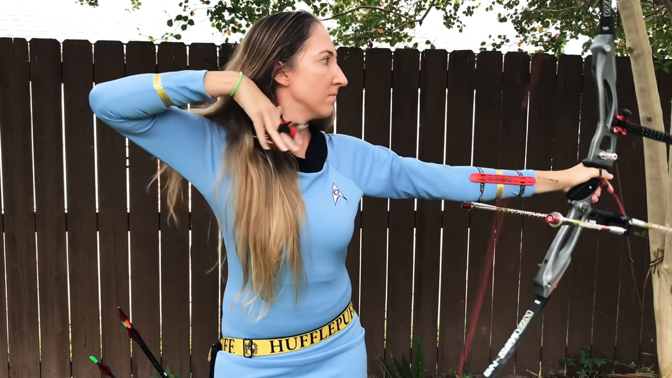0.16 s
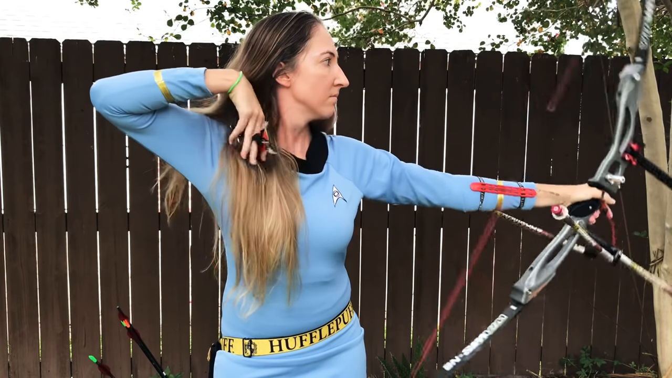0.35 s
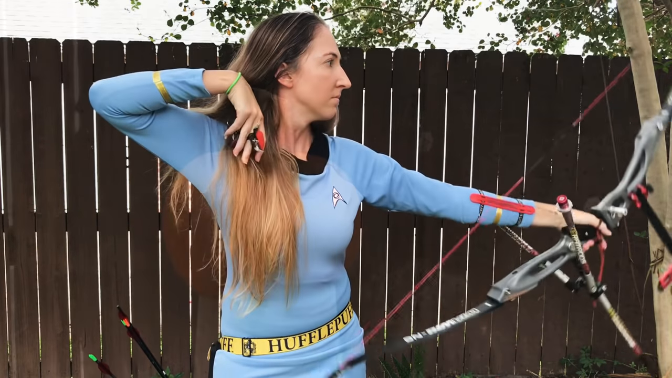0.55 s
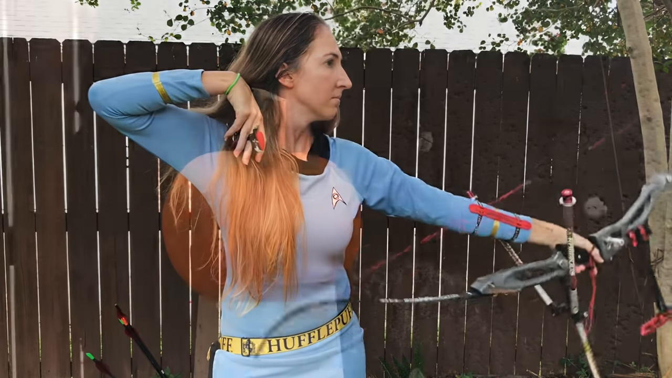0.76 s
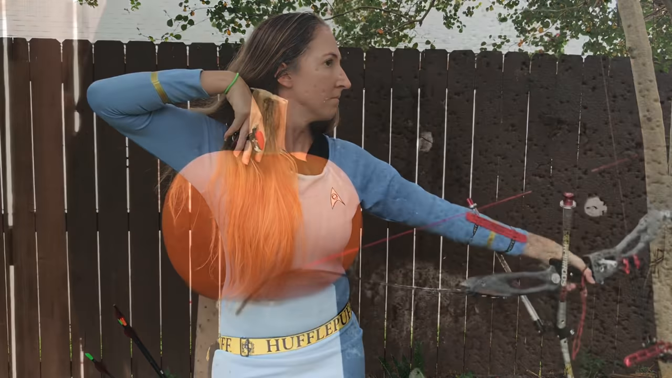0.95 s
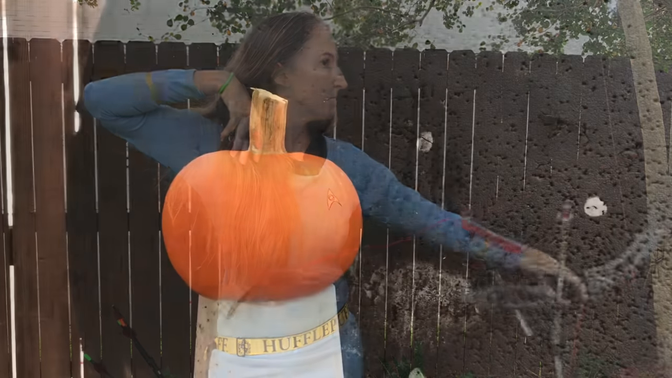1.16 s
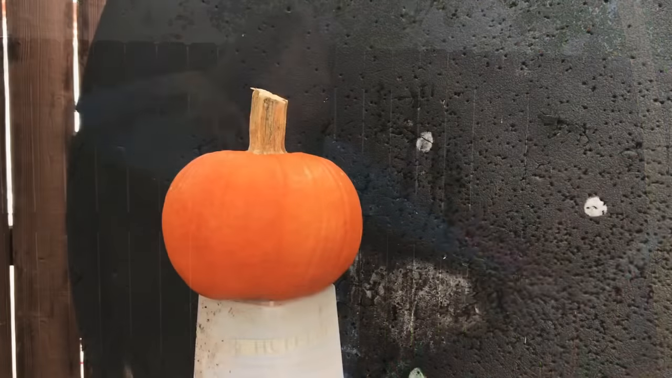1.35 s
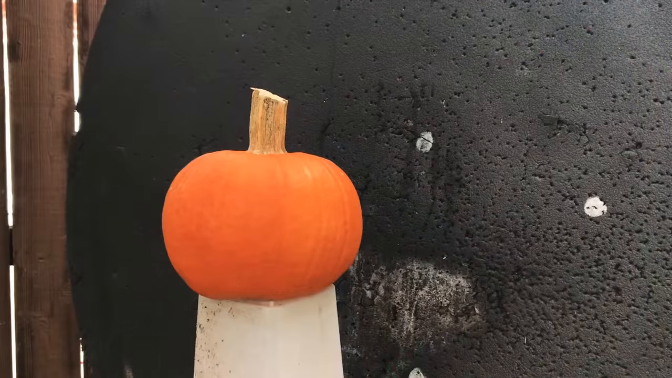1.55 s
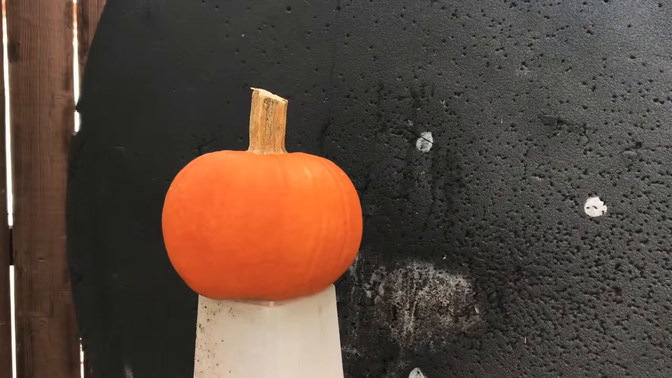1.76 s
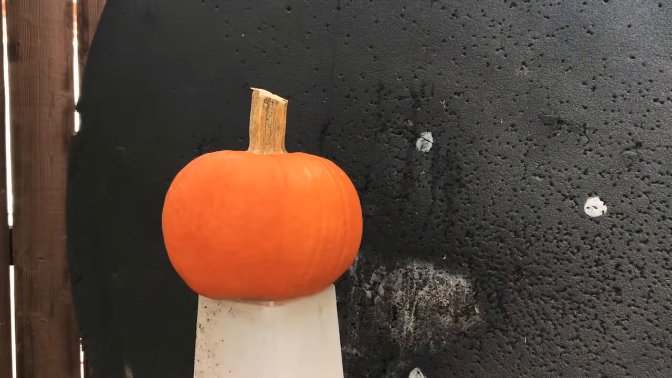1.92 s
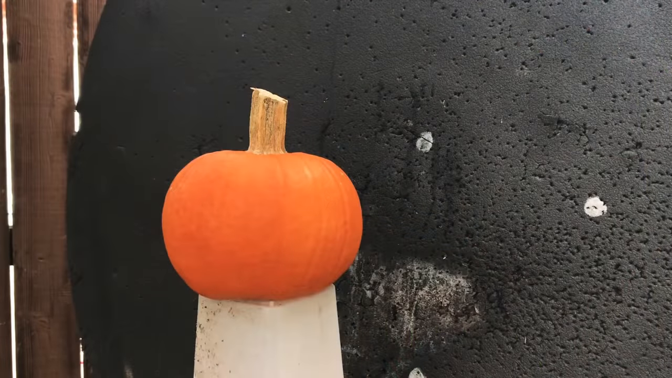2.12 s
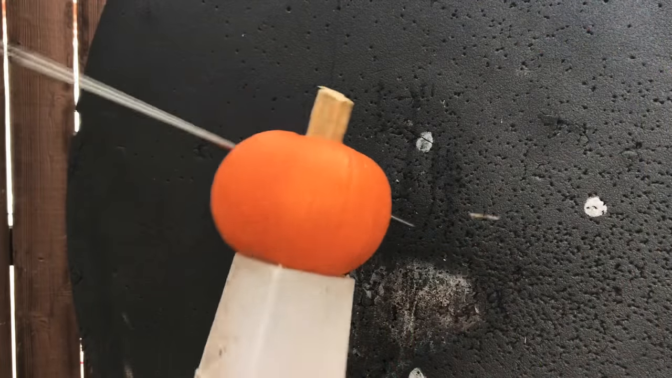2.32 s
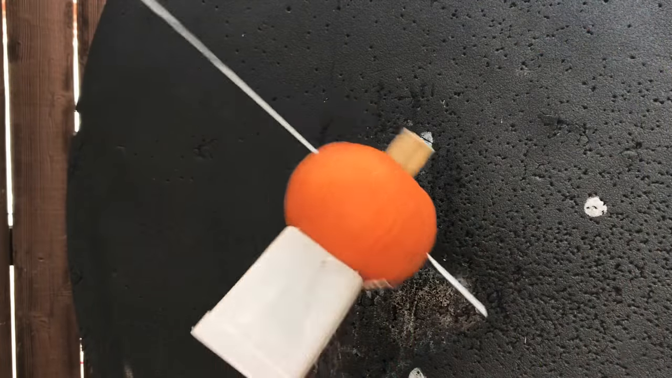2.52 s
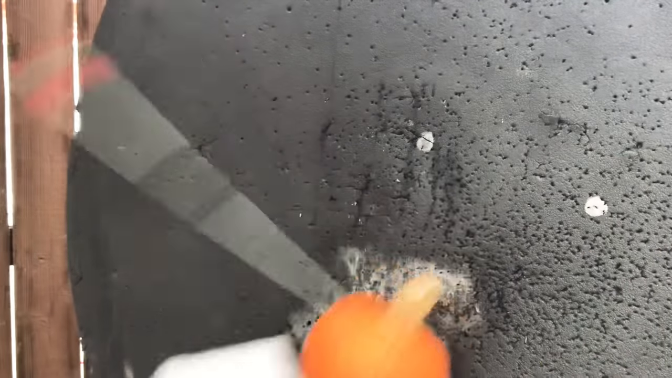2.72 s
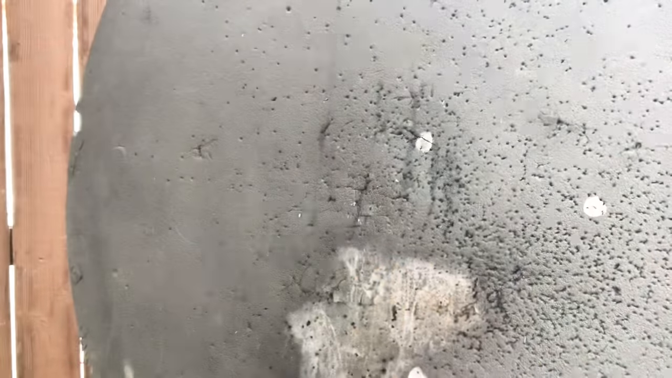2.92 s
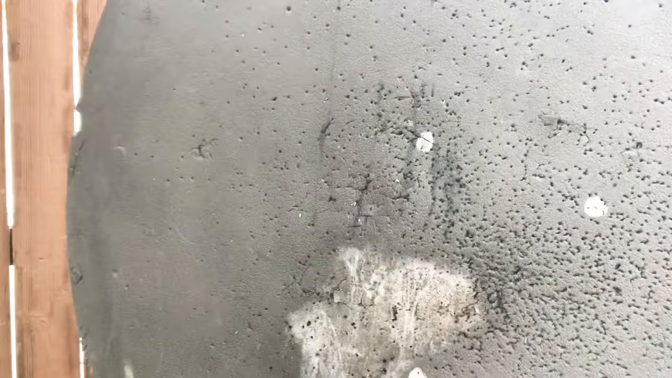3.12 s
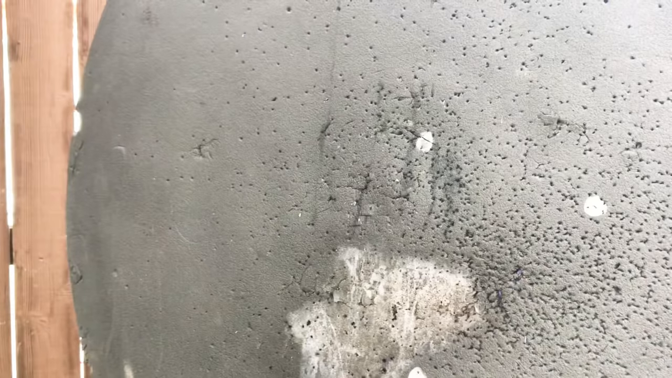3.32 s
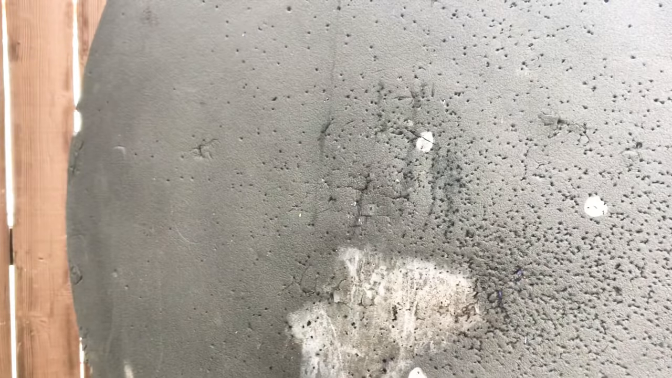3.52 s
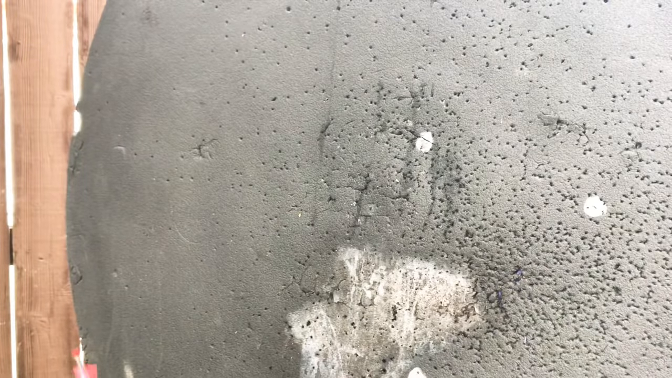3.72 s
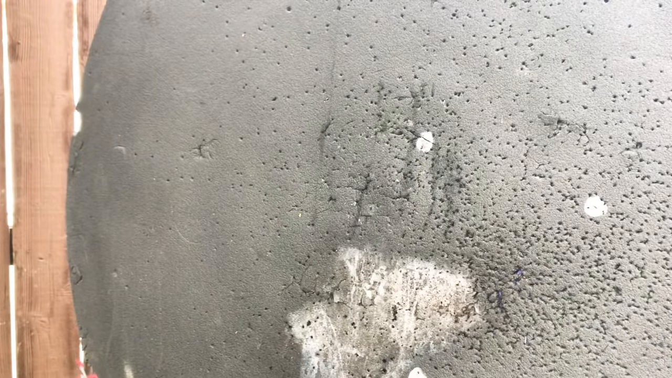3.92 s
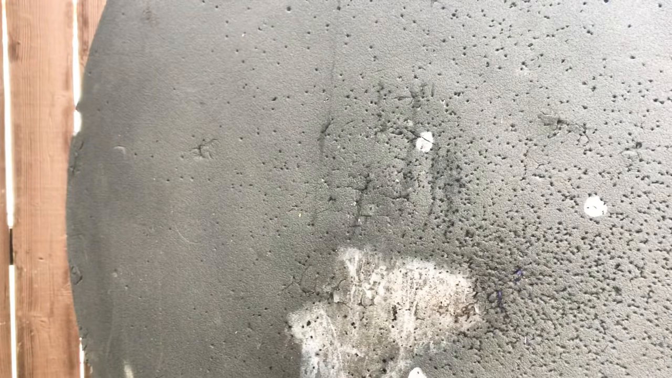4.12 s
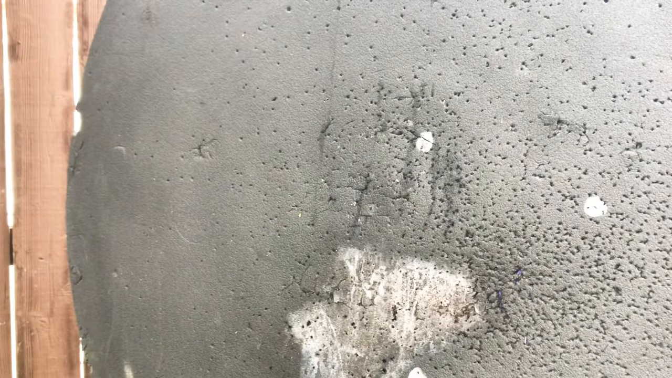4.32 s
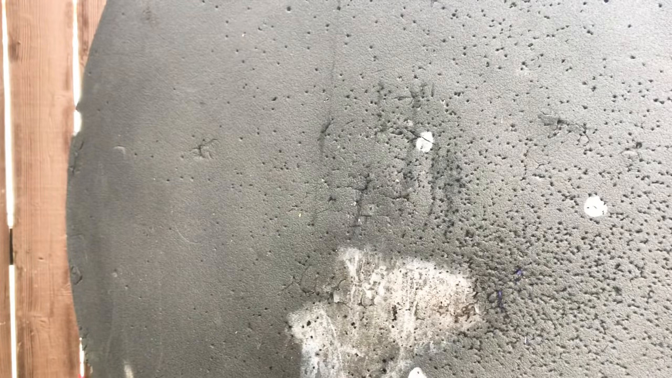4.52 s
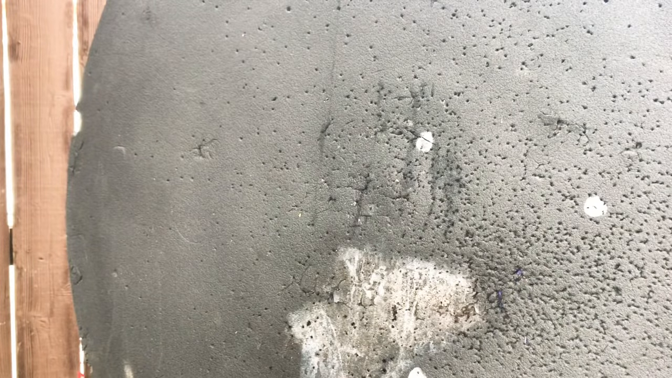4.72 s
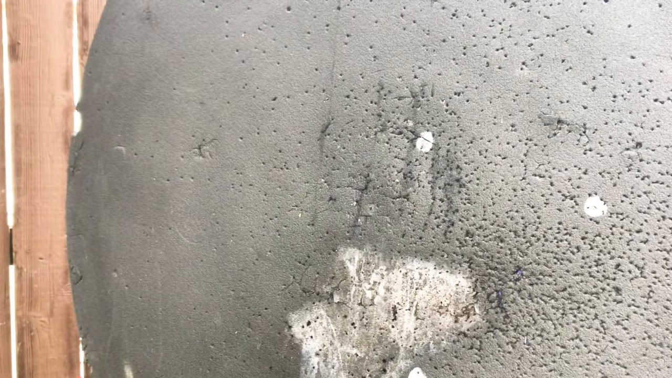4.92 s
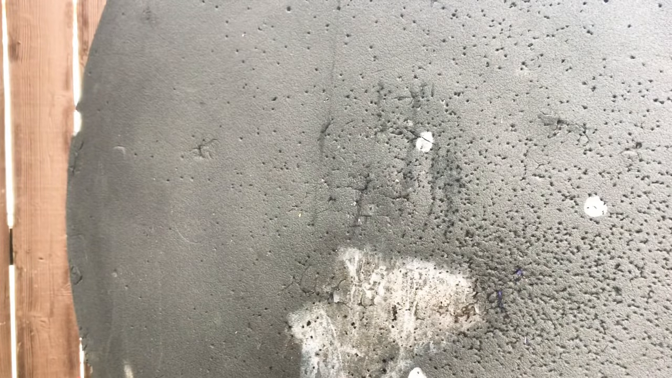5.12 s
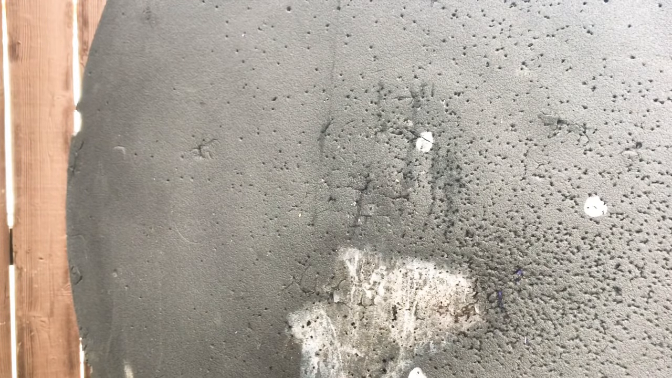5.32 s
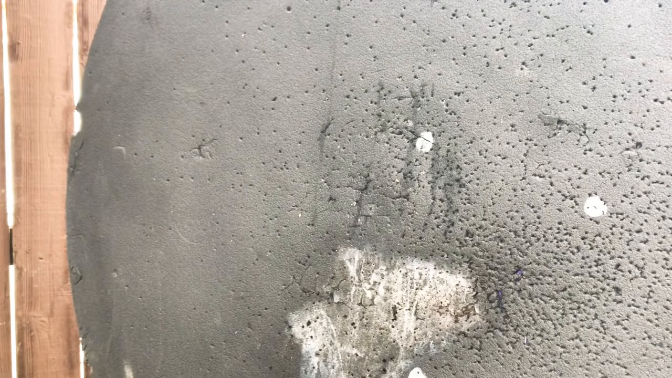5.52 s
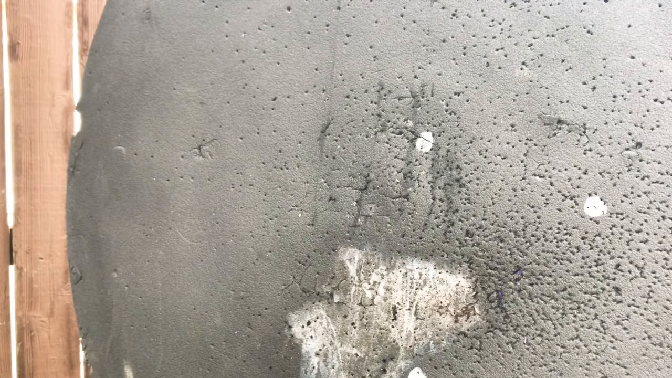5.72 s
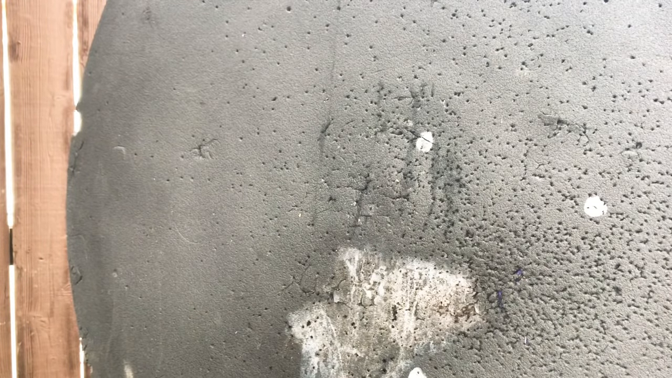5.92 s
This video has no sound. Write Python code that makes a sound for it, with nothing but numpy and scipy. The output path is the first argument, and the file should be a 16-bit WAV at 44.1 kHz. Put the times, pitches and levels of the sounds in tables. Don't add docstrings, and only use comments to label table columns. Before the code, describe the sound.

In a fenced yard with low distant traffic, a bowstring zips loose, limbs rattle and hum, and an arrow slaps foam almost at once. After a quiet gap, close up, an arrow cracks through a pumpkin; its hollow plastic stand knocks, scrapes, squeaks, topples and bounces loudly, then settles with light taps. The arrow shaft finally rustles in dry leaves.

```python
import sys
import numpy as np
from scipy import signal
from scipy.fft import rfft, irfft
from scipy.io import wavfile
from scipy.ndimage import uniform_filter1d, map_coordinates

SR = 44100
rng = np.random.default_rng(int(sys.argv[2]) if len(sys.argv) > 2 else 0)


def file_out(sig):
    cols = np.atleast_2d(sig).T
    lim = np.clip(cols, -1, 1)
    pcm = np.round(lim * 32767).astype(np.int16)
    wavfile.write(sys.argv[1], SR, pcm)


def invert_db(x):
    u = np.asarray(x, float) / 20
    return 10 ** u


N = 267246

# (time [s], level [dB])
AIR_GAIN = [(0.0, -41.5), (0.52, -54), (2.04, -55.5), (2.8, -44), (3.93, -54.5), (6.06, -55)]
# (frequency [Hz], density [dB per Hz])
TRAFFIC_SPECTRUM = [(25, -17), (43, 0), (107, 4), (223, -6), (345, -9.5), (500, -26.5), (1200, -32.5),
                    (2640, -120)]
HISS_SPECTRUM = [(240, -36), (400, -8), (472, -4), (501, -6.5), (540, -4), (3590, -16.5), (14500, -26.5)]
HISS_DB, CLOSER_START_S, CLOSER_RAMP_S, CLOSER_DB = -16, 0.55, 1.6, 5.5
# (frequency [Hz], t60 [s])
YARD_T60 = [(200, 0.9), (1500, 0.5), (4000, 0.68), (12000, .2)]

# (time [s], peak [dB], centre [Hz])
SHARP_TICKS = [(.018, -45, 9000), (.022, -48, 4000), (.038, -27, 4500), (.0415, -18, 10600),
               (.054, -16, 12000), (.138, -28, 13500), (.149, -26, 12000), (.178, -38, 11000),
               (.687, -56, 7000), (2.356, -27, 4500), (2.556, -40, 3000), (2.592, -40, 3000),
               (2.8715, -20, 4000), (2.909, -30, 1200), (4.846, -32, 7500), (5.167, -48, 12000),
               (.061, -14.5, 10900), (.083, -17.5, 9780), (2.3018, -6, 10500), (2.7175, -25, 7750),
               (2.9895, -17, 10500), (2.926, -33, 8960), (3.37, -39, 7570), (3.416, -14, 7000),
               (3.622, -44, 4070), (3.847, -30, 3300), (4.825, -23.5, 8944), (4.877, -30, 14000),
               (4.874, -36, 14000), (5.032, -21.5, 4010), (5.134, -38.5, 12080)]

# (time [s], level [dB])
LIMB_SHUDDER = [(.034, -59.5), (.04, -31), (.054, -18.5), (.078, -19), (.118, -30), (.155, -36), (.27, -54),
                (.553, -63.5), (.56, -90)]
# (frequency [Hz], density [dB per Hz])
LIMB_SPECTRUM = [(60, -39.5), (100, -14), (197, -1), (752, -14), (1200, -12.5), (2370, -12), (5900, -16.5),
                 (16000, -25)]
# (frequency [Hz], level [dB], t60 [s])
LIMB_MODES = [(186, -15.5, 0.17), (152, -40, 2.3), (592, -35, .4), (300, -26, .08), (910, -19, 0.2),
              (1120, -23, .1), (1620, -28.5, 0.13), (2200, -24, .1), (3180, -24, .1), (1990, -27, .12),
              (5160, -28, .1), (6070, -30, .15)]
# (frequency [Hz], level [dB], t60 [s])
LIMB_HUM = [
    (189.6, -30, 1.25),
    (191.8, -30, 1.2),
]
# (frequency [Hz], level [dB], t60 [s])
FOAM_MODES = [(1280, 7, 0.014), (1500, -3, 0.019), (1790, -3, .018), (2400, -9, 0.014)]

# (time [s], length [s], start [Hz], end [Hz], level [dB])
STRING_ZIP = [
    (0.042, 0.0086, 2690, 3890, -11.5),
    (0.048, 0.004, 3900, 2900, -16),
    (0.051, 0.0053, 2700, 2200, -18.5),
]
# (time [s], length [s], start [Hz], end [Hz], level [dB])
PLASTIC_SQUEAK = [
    (2.7835, 0.012, 3980, 4500, -10),
]
SLIP_SHARE = 0.03

# (time [s], peak [dB], frequency [Hz], rise [ms])
HOLLOW_BOOMS = [(2.292, -21, 296, 6), (2.331, -27, 264, 3.7), (2.413, -20, 291, 1.7),
                (2.463, -28.5, 304, 1.8), (2.499, -20, 275, 8.4), (2.535, -16, 288, 7.6),
                (2.597, -29.5, 307, 5.9), (2.65, -33, 275, 2.8), (2.801, -29, 234, 4.7),
                (2.879, -12.5, 283, 1.7), (2.921, -18, 280, 1.7), (2.954, -8.5, 288, 13),
                (2.975, -22, 288, 8), (2.992, -7, 288, 6), (3.191, -41, 301, 7.5), (3.238, -45, 285, 9),
                (3.301, -50, 231, 2.6), (3.4279, -13, 280, 3), (3.435, -10, 280, 4.5),
                (3.517, -40, 277, 2.1), (3.569, -37, 288, 15), (3.663, -39, 288, 5), (3.776, 0, 272, 11),
                (3.846, -33, 253, 5), (3.911, -35, 261, 3.4), (3.932, -37, 265, 6), (3.985, -42.5, 285, 5),
                (4.156, -38, 326, 7), (4.18, -29.5, 277, 7), (4.37, -35, 275, 10)]
HOLLOW_T60_S, FREER_S_PER_DB = 0.084, 0.0009
# (time [s], peak [dB], centre [Hz], click
# [dB])
WALL_KNOCKS = [(2.302, -8, 520, 6), (2.31, -8, 1050, -1), (2.331, -8, 680, -28), (2.356, -16, 1300, -10.5),
               (2.406, -13, 654, -17.5), (2.44, -29, 1094, -17.5), (2.475, -24, 651, -24.5),
               (2.517, -29.5, 1280, -11.5), (2.554, -33, 659, -12), (2.592, -42, 1030, -14),
               (2.706, -17, 900, -14), (2.74, -23, 940, -14), (2.797, -8, 700, -16), (2.879, -9, 850, -12),
               (2.919, -12, 1230, -18), (2.931, -16, 742, -26), (2.955, -11, 800, -14),
               (2.989, -1, 820, -14), (3.186, -31.5, 651, -4.5), (3.303, -27, 480, -22),
               (3.408, -10, 1100, -6), (3.416, -18, 1600, -3), (3.429, -12, 800, -7),
               (3.659, -31, 800, -24), (3.704, -32, 800, -18), (3.753, -43, 700, -20),
               (3.776, -1.5, 1120, -21), (4.155, -33, 1160, -16), (4.18, -33, 1200, -22),
               (4.376, -38, 851, -12),
               (2.99, -4, 1600, -31.5),
    (2.9895, -10, 3900, -26),
    (3.409, -3, 1080, -30),
    (3.847, -32, 3000, -8),
    (3.777, -10, 1900, -29.5),
    (2.879, -10, 1700, -30),
]
# (frequency [Hz], level [dB], share of blow t60 [1])
WALL_MODES = [(427, -7, 1.6), (508, -7, 1.2), (600, -6, 1.1), (727, -3, 1.15), (860, -3, 0.6),
              (1040, -2, 1.0), (1085, -1, .85), (1290, -3, 0.8), (1526, 1, 0.75), (1845, -2, 1.0),
              (2030, 0, 1.15), (2190, -2, .9), (2770, -8, .9), (4300, -14, 1)]
WALL_T60_S, HARD_SHORTENS, LIGHT_SHORTENS = 0.058, 0.5, 0.13
DETUNE_SHARE = 0.013
EDGE_DB = -10.5
# (time [s], level [dB],
# frequency [Hz], t60 [s])
LOW_RINGS = [(.46, -39, 84, .3), (2.293, -18, 100, .09), (2.294, -15, 190, .08), (2.36, -30, 185, .2),
             (2.43, -31, 200, .25), (2.313, -19, 530, .08), (2.333, -20, 630, .09), (2.362, -27, 570, .08),
             (2.408, -22, 600, .08), (2.465, -28, 610, .08), (2.54, -31, 580, .09), (2.645, -31, 345, .08),
             (2.665, -30, 600, .09), (2.812, -25, 560, .1), (2.802, -22, 745, .12), (2.99, -22, 200, .1),
             (2.792, -25.5, 65, .12), (2.878, -21, 140, .16), (2.987, -16, 110, .08), (3.41, -19, 160, .1),
             (3.777, -18, 120, .08), (4.181, -22, 132, 0.052), (4.184, -29, 387, 0.11),
             (4.81, -36, 822, 0.071), (4.82, -44, 620, .1), (4.85, -44, 1330, .12), (4.95, -48, 750, .12),
             (5.024, -41, 1300, .15), (5.05, -50, 930, .15), (5.112, -45, 680, .08),
             (5.615, -48, 1150, .1)]

# (time [s], level [dB], centre [Hz], share of t60 [1])
SHAFT_TAPS = [(2.3018, -16, 4300, .6), (2.3105, -13, 3400, 0.6), (2.37, -36, 4500, .5),
              (2.39, -33, 4500, 0.5), (3.318, -60, 5040, 1.25), (3.384, -49, 4000, .9),
              (4.828, -42, 7200, 0.7), (4.845, -50, 6400, .8), (5.022, -40, 5600, 1.3),
              (5.032, -46, 3370, 1.3), (5.073, -52, 4300, 1.6)]
# (frequency [Hz], level [dB], t60 [s])
SHAFT_MODES = [(1345, -6, .06), (2950, -5, 0.05), (3410, 3, 0.051), (3510, 2, 0.05), (4130, 1, 0.06),
               (4410, -10, 0.017), (4735, 0, .05), (5230, -4, .05), (6075, -1, .08), (6900, -9, 0.08),
               (9600, -9.5, .03), (11585, -5, .05)]
# (time [s], centre [Hz], level [dB])
FEATHER_FLIGHT = [
    (2.0, 2670, -85.5),
    (2.1, 2987, -72.5),
    (2.2, 3800, -71),
    (2.277, 4867, -69.5),
]

# (time [s], peak [dB], centre [Hz], treble [dB], t60 [s])
ENTRY_SCRAPES = [(2.278, -22, 4300, -10.5, .05), (2.289, -9, 3000, -17, 0.036),
                 (2.304, -3, 3417, -11.5, .13), (2.335, -25, 4660, -14.5, 0.35),
                 (2.65, -36, 4200, -22, .05), (2.99, -15, 1500, -20, 0.055),
                 (3.412, -7, 2539, -22.5, 0.066), (3.424, -7, 3000, -18, 0.035),
                 (3.778, -14, 1300, -30.5, 0.08), (3.317, -24, 4500, -9, .22),
                 (4.804, -27, 1200, -19.5, .17), (5.022, -26, 3420, -16.5, .12)]
# (time [s], peak [dB], centre [Hz], treble [dB])
STAND_SKIDS = [(2.4014, -17, 1580, -38), (2.666, -21, 1555, -30.5), (2.7094, -18.5, 1380, -20),
               (2.7134, -24.5, 1600, -25.5), (2.743, -20.5, 2400, -18.5), (2.7664, -15, 4010, -12),
               (2.797, -21, 2700, -20), (2.87, -9, 2400, -16), (2.925, -26, 1492, -29),
               (3.1797, -31, 2143, -7), (3.3827, -29, 1200, -5), (3.454, -27, 2160, -14.5),
               (3.5343, -35, 5620, -13), (3.626, -53, 2940, -22), (3.6548, -38.5, 1660, -21.5),
               (3.85, -35.5, 1500, -18), (3.985, -37, 2000, -24), (4.0, -38, 2200, -24),
               (4.1457, -32, 1940, -21), (4.2756, -43, 3170, -13.5), (4.363, -37, 1860, -26.5),
               (4.4857, -45, 2010, -35), (4.675, -45, 1700, -30)]
# (time [s], peak [dB], centre [Hz], treble [dB])
LEAF_BRUSHES = [(4.779, -31, 7000, -26), (4.823, -24, 8620, -16), (4.843, -32, 7100, -17.5),
                (4.862, -38, 4000, -11.5), (4.9107, -38, 5930, -10), (4.9342, -33, 3200, -17),
                (4.965, -38, 1500, -25), (4.99, -39, 1300, -30), (5.0633, -37, 4400, -23),
                (5.1074, -36, 1260, -20), (5.129, -37.5, 6600, -15), (5.3094, -49, 1510, -11.5),
                (5.4362, -48, 1330, -13), (5.5016, -43, 1404, -10.5), (5.635, -37, 2900, -23),
                (5.8574, -47, 4130, -11)]
SKID_T60_S, LEAF_T60_S = 0.08, 0.075
HOLD_S, HOLD_S_PER_DB, LONGEST_HOLD_S = 0.006, 0.0004, 0.018

# (time [s], effort [dB], grit share [dB])
TUMBLE_DRAG = [(2.28, -48, -14), (2.36, -34, -18), (2.74, -41, -17), (2.86, -41, -9), (3.0, -57, 5),
               (3.5, -58, 3), (3.7, -62, 2), (4.5, -66, -5)]
# (frequency [Hz], density [dB per Hz])
DRAG_SPECTRUM = [(180, -27), (300, 0), (337, -5.5), (502, -17.5), (737, -22), (1120, -24), (4990, -30),
                 (16000, -33.5)]
# (time [s], hold [s], level [dB], grit share [dB])
LEAF_SWEEPS = [
    (4.815, .335, -64, 4),
    (5.605, .08, -68, 12.5),
]
SWEEP_RISE_DB_PER_S, SWEEP_FALL_DB_PER_S = 250, 260
STAND_MURMUR_DB = -65

# (time [s], level [dB])
RUB_GAIN = [(2.31, -38), (2.42, -47), (2.63, -64), (2.675, -44), (2.702, -56), (2.74, -47), (2.78, -33),
            (2.82, -42), (2.86, -46), (2.87, -70)]
# (centre [Hz], width [octaves], level [dB])
RUB_RESONANCES = [(4200, .09, -2), (5800, .08, -8), (8200, .2, -12), (1500, .7, 2), (4000, .6, -9)]

SHELF_HZ, SHELF_WIDTH_HZ = 15450, 450


def unit(x):
    return x / np.sqrt(np.mean(x ** 2) + 1e-20)


def along(points, hz):
    f, v = np.transpose(points)
    return np.interp(np.log(hz + 1), np.log(f + 1), v)


def curves(rows):
    s, *columns = np.transpose(rows)
    t = np.arange(N) / SR
    return [invert_db(np.interp(t, s, db, left=-120, right=-120)) for db in columns]


def noise(gain, size=N, spiky_db=0.):
    grains = np.minimum(rng.exponential(1, size), 5)
    white = rng.standard_normal(size) * invert_db(spiky_db * grains)
    return unit(irfft(rfft(white) * gain(np.fft.rfftfreq(size, 1 / SR)), size))


def add(track, s, sound):
    part = track[round(s * SR):][:len(sound)]
    part += sound[:len(part)]


def ring(modes, rise_s, scatter_db=0., size=SR // 2):
    t = np.arange(size) / SR
    tones = np.zeros(size)
    for hz, db, t60 in modes:
        decay = invert_db(db + scatter_db * rng.normal() - 60 * t / t60)
        tones += decay * np.sin(2 * np.pi * hz * t)
    return tones * (1 - np.exp(-t / rise_s))


def struck(modes, centre_hz, octaves, t60):
    return [(hz, db - 5.1 * (np.log2(hz / centre_hz) / octaves) ** 2, t60 * share)
            for hz, db, share in modes]


def hump(hz, centre_hz, octaves):
    return np.exp(-0.5 * (np.log2((hz + 1) / centre_hz) / octaves) ** 2)


def patchy(x, depth_db):
    z = signal.stft(x, nperseg=128)[2]
    field = uniform_filter1d(rng.standard_normal(z.shape), size=4, axis=0)
    field = unit(uniform_filter1d(field, size=3, axis=1))
    gain = invert_db(depth_db * field - 0.061 * depth_db ** 2)
    return signal.istft(z * gain, nperseg=128)[1][:N]


def yard(x, centre_hz, octaves):
    hz, t, z = signal.stft(rng.standard_normal(SR), SR, nperseg=256)
    decay = invert_db(-60 * t / along(YARD_T60, hz)[:, None])
    tail = signal.istft(z * hump(hz, centre_hz, octaves)[:, None] * decay, SR, nperseg=256)[1]
    delayed = np.pad(x, (500, 0))
    return signal.fftconvolve(delayed, tail / np.linalg.norm(tail))[:N]


def air():
    gain, = curves(AIR_GAIN)
    t = np.arange(N) / SR
    swell_db = 1.4 * map_coordinates(rng.standard_normal(60), [t * 8])
    traffic = invert_db(swell_db) * noise(lambda hz: invert_db(along(TRAFFIC_SPECTRUM, hz)))
    closer = np.clip((t - CLOSER_START_S) / CLOSER_RAMP_S, 0, 1)
    hiss = invert_db(HISS_DB + CLOSER_DB * closer) * noise(lambda hz: invert_db(along(HISS_SPECTRUM, hz)))
    return gain * (traffic + hiss)


def ticks():
    out, t = np.zeros(N), np.arange(512) / SR
    for s, db, hz in SHARP_TICKS:
        snap = noise(lambda f: hump(f, hz, 0.54), size=512)
        add(out, s, invert_db(db - 5 - 60 * t / 0.007) * snap)
    return out


def bow():
    rattle = curves(LIMB_SHUDDER)[0] * noise(lambda hz: invert_db(along(LIMB_SPECTRUM, hz)), spiky_db=3.0)
    t = np.arange(2048) / SR
    slap = noise(lambda hz: hump(hz, 1800, 1.0) + 0.1, size=2048)
    add(rattle, 0.1245, invert_db(-20 - 60 * t / 0.02) * slap)
    out = rattle + invert_db(-21) * yard(np.roll(rattle, 2000), 1480, 0.42)

    wobble = map_coordinates(rng.standard_normal(90), [np.arange(2 * SR) * 40 / SR])
    shake = invert_db(1.8 * wobble)
    add(out, 0.051, shake * ring(LIMB_MODES, 0.0012, size=2 * SR))
    add(out, 0.122, shake * ring(LIMB_HUM, 0.012, size=2 * SR))

    add(out, 0.1245, invert_db(-8) * ring(FOAM_MODES, 0.0003, size=2048))
    add(out, 0.1278, invert_db(-17) * ring(FOAM_MODES, 0.0006, size=2048))
    add(out, 0.129, ring([(120, -19, 0.12), (1500, -25.5, 0.012)], 0.0029))
    add(out, 0.189, ring([(1580, -35, 0.013)], 0.00065))
    return out


def whistles():
    out = np.zeros(N)
    # overtone [dB], how late the glide comes
    rows = [(*row, -26, 1.) for row in STRING_ZIP] + [(*row, -14, 5.) for row in PLASTIC_SQUEAK]
    for s, length_s, start_hz, end_hz, db, over_db, late in rows:
        u = np.linspace(0, 1, int(length_s * SR))
        slip = 1 + SLIP_SHARE * unit(uniform_filter1d(rng.standard_normal(len(u)), size=24))
        hz = (start_hz + (end_hz - start_hz) * u ** late) * slip
        phase = 2 * np.pi * np.cumsum(hz) / SR
        tone = np.sin(phase) + invert_db(over_db) * np.sin(2 * phase)
        add(out, s, invert_db(db) * np.sin(np.pi * u ** 2.2) ** 0.8 * tone)
    return out


def stand():
    out, t = np.zeros(N), np.arange(2048) / SR
    for s, db, hz, rise_ms in HOLLOW_BOOMS:
        add(out, s, ring([(hz, db + 5.5, HOLLOW_T60_S - FREER_S_PER_DB * db)], rise_ms / 1000))
    for s, db, hz, click_db in WALL_KNOCKS:
        t60 = WALL_T60_S * (1000 / hz) ** HARD_SHORTENS * invert_db(LIGHT_SHORTENS * db)
        woken = []
        for k, (mode_hz, mode_db, mode_t60) in enumerate(struck(WALL_MODES, hz, 0.3, t60)):
            sign = (-1) ** k
            woken.append((sign * mode_hz * (1 + DETUNE_SHARE * rng.normal()), mode_db, mode_t60))
        add(out, s, invert_db(db - 5.5) * ring(woken, 0.0003, scatter_db=1.5, size=8192))
        slap = invert_db(-2.5) * noise(lambda f: hump(f, 1.35 * hz, 0.45), size=2048)
        click = invert_db(click_db) * noise(lambda f: hump(f, 4600, 0.31), size=2048)
        edge = invert_db(click_db + EDGE_DB) * noise(lambda f: hump(f, 7300, 0.65), size=2048)
        add(out, s, invert_db(db - 6 - 60 * t / (0.36 * t60)) * (slap + click + edge))
    for s, db, hz, t60 in LOW_RINGS:
        add(out, s, ring([(hz, db, t60)], 0.004))
    return out


def arrow():
    out = np.zeros(N)
    for s, db, hz, share in SHAFT_TAPS:
        woken = struck(SHAFT_MODES, hz, 0.55, share)
        add(out, s, invert_db(db) * ring(woken, 0.0005, scatter_db=2, size=8192))
    s, hz, db = np.transpose(FEATHER_FLIGHT)
    bins, t, z = signal.stft(rng.standard_normal(N), SR, nperseg=256)
    gain = invert_db(np.interp(t, s, db, left=-120, right=-120) + 13)
    sweep = hump(bins[:, None], np.interp(t, s, hz), 0.3) * gain
    return out + signal.istft(z * sweep, SR, nperseg=256)[1][:N]


def scuffs():
    out, t = np.zeros(N), np.arange(8192) / SR
    # t60 [s] where missing, spikiness [dB]
    rows = [(*row, 4.) for row in ENTRY_SCRAPES]
    rows += [(*row, SKID_T60_S, 4.) for row in STAND_SKIDS]
    rows += [(*row, LEAF_T60_S, 2.5) for row in LEAF_BRUSHES]
    for s, db, hz, treble_db, t60, spiky_db in rows:
        hold_s = min(HOLD_S - HOLD_S_PER_DB * db, LONGEST_HOLD_S)
        bumps = uniform_filter1d(rng.standard_normal(4097), size=40)
        ripple = invert_db(3 * unit(uniform_filter1d(bumps, size=40)))

        def colour(f):
            body = hump(f, hz, 0.53) + 0.98 * hump(f, 1400, 1.0)
            return ripple * (body + invert_db(treble_db + 6) * hump(f, 11000, 0.92))

        stroke = (1 - np.exp(-t / 0.0026)) * invert_db(-60 * np.maximum(t - hold_s, 0) / t60)
        add(out, s, invert_db(db - 14.5) * stroke * noise(colour, size=8192, spiky_db=spiky_db))
    return out


def tumble():
    body, share = curves(TUMBLE_DRAG)
    grit, t = body * share, np.arange(N) / SR
    for s, hold_s, db, grit_db in LEAF_SWEEPS:
        rise_db = SWEEP_RISE_DB_PER_S * np.maximum(s - t, 0)
        fall_db = SWEEP_FALL_DB_PER_S * np.maximum(t - s - hold_s, 0)
        stroke = invert_db(db - rise_db - fall_db)
        body = body + stroke
        grit = grit + invert_db(grit_db) * stroke
    low = body * noise(lambda hz: invert_db(along(DRAG_SPECTRUM, hz)) * hump(hz, 640, 0.8), spiky_db=7)
    murmur = np.clip((t - 2.3) / 1.5, 0, 1) * noise(lambda hz: hump(hz, 300, 0.3))
    high = noise(lambda hz: invert_db(along(DRAG_SPECTRUM, hz)) * hz ** 2 / (hz ** 2 + 800 ** 2), spiky_db=4)
    return low + invert_db(STAND_MURMUR_DB) * murmur + grit * high


def rubbing():
    def colour(f):
        return sum(invert_db(db) * hump(f, hz, octaves) for hz, octaves, db in RUB_RESONANCES)

    return curves(RUB_GAIN)[0] * patchy(noise(colour, spiky_db=3), depth_db=3)


def scene():
    scrapes = patchy(scuffs() + tumble(), depth_db=2.5)
    near = stand() + arrow() + scrapes + whistles() + ticks() + rubbing()
    return (bow() + near + invert_db(-31) * yard(near, 1200, 2.1) + air())[None]


def roll_off(x):
    return signal.sosfilt(signal.butter(12, 16790, fs=SR, output="sos"), x)


def record(dry):
    above = np.clip((np.fft.rfftfreq(N, 1 / SR) - SHELF_HZ) / SHELF_WIDTH_HZ, 0, 1)
    dull = irfft(rfft(dry) * invert_db(-30 * above ** 2), N)
    soft = dull / (1 + np.abs(dull / 0.95) ** 6) ** (1 / 6)
    return roll_off(soft)


dry = scene()
out = record(dry)
file_out(out)
```